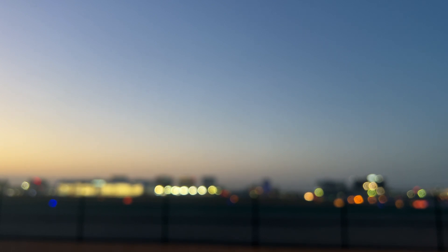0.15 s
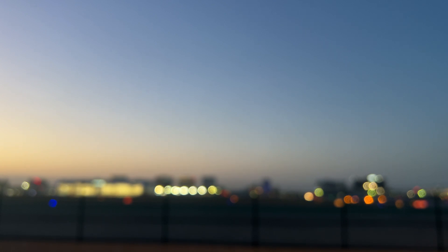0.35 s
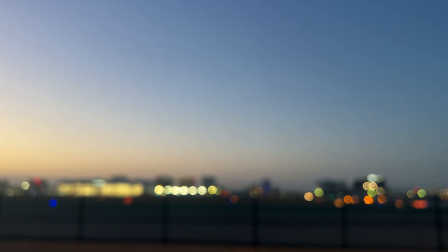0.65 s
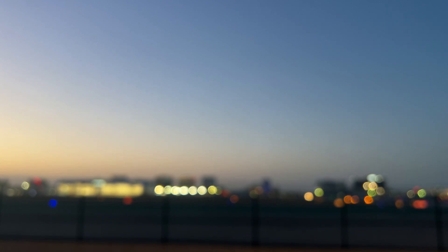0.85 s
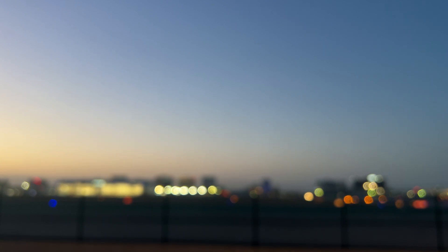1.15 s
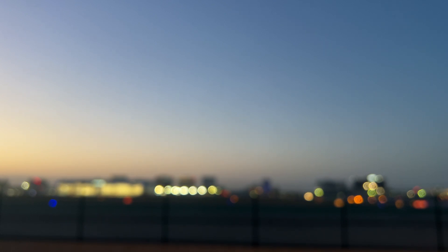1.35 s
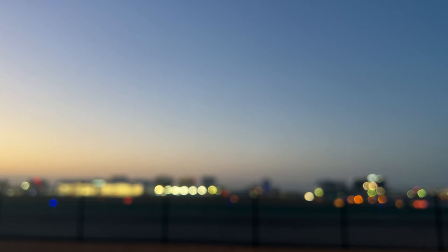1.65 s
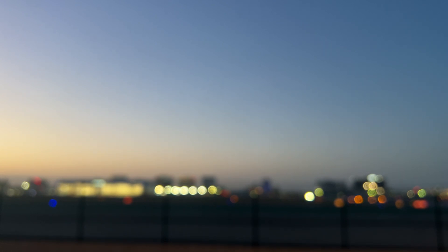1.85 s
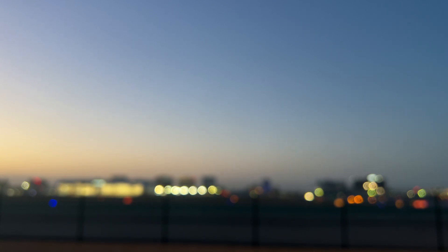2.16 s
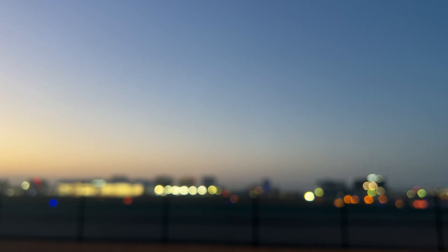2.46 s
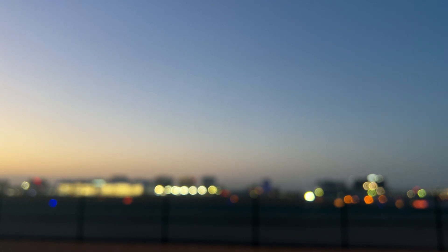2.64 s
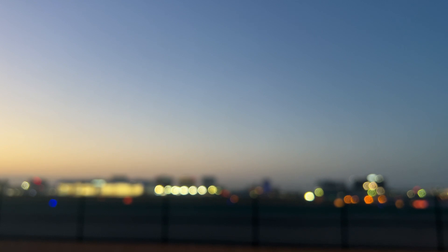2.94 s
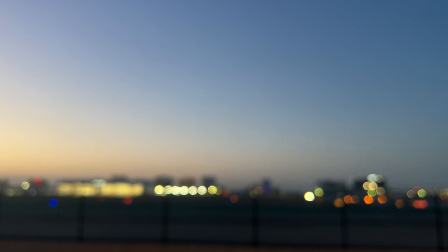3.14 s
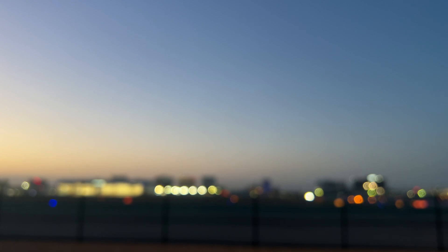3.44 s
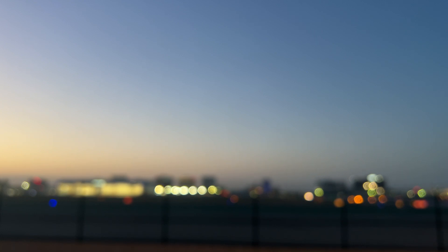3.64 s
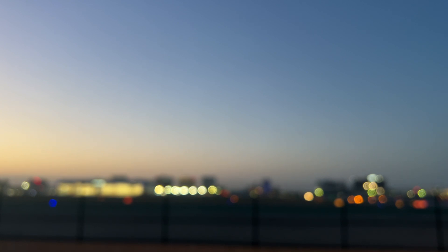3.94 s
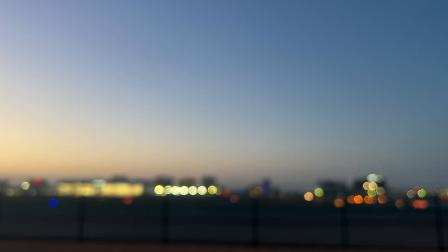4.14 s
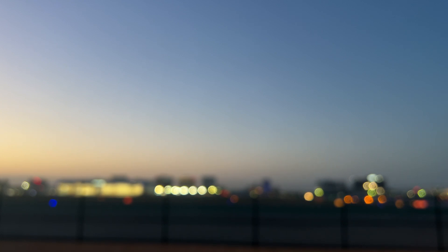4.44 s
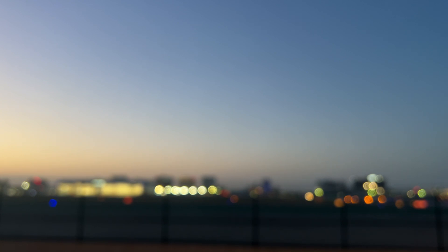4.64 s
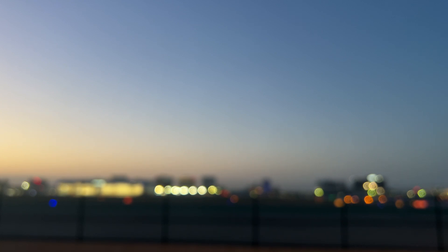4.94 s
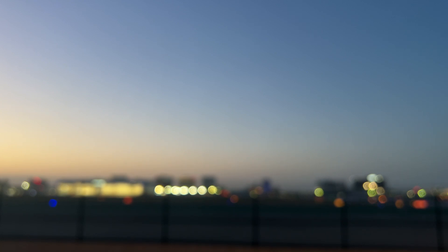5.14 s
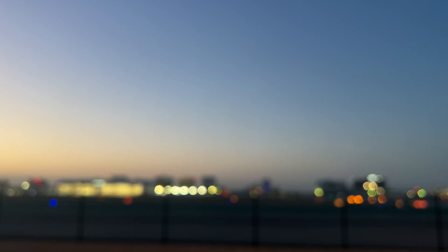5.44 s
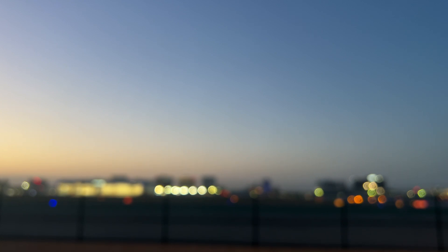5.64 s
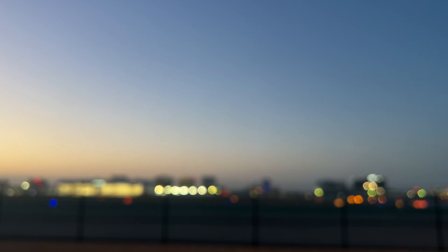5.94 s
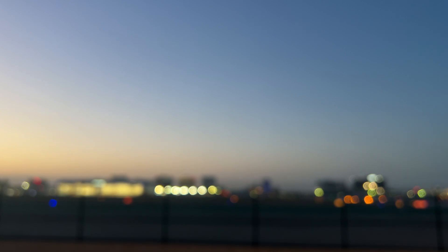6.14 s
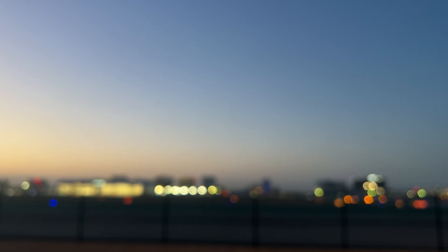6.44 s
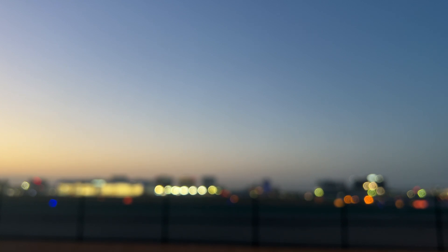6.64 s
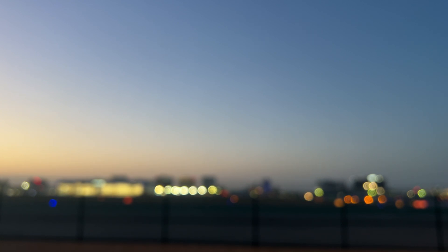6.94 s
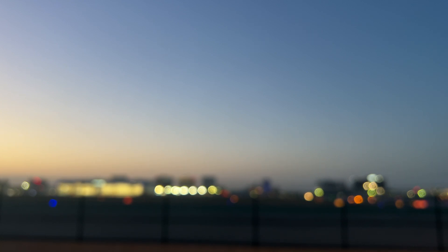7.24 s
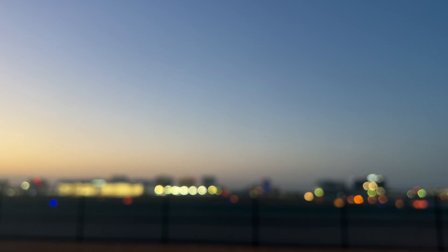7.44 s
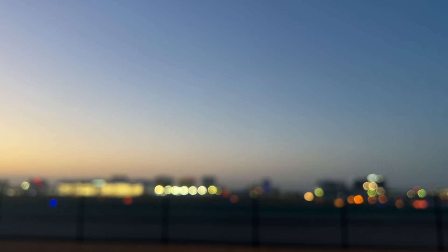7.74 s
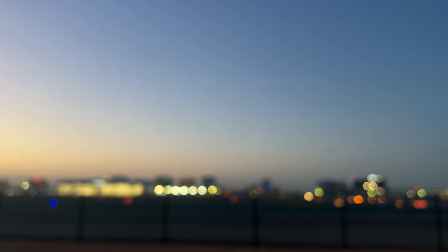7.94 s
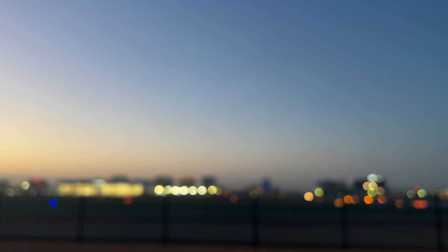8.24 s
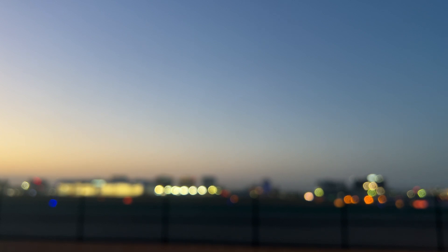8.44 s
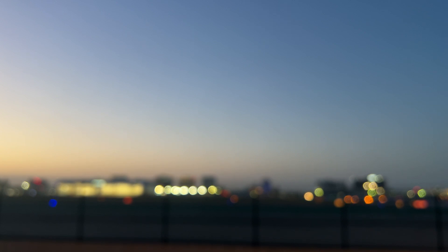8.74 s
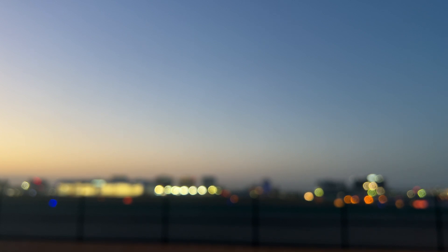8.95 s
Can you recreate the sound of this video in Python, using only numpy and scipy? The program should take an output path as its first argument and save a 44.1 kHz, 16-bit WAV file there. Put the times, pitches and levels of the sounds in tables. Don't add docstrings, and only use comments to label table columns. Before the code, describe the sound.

A wide, open outdoor ambience at dusk, dominated throughout by a low, soft rumble of far traffic and heavy engines, strongest in the deep bass, with a muffled middle and faint airy hiss. It swells slightly, with small blurred revs around 0.2, 1, 2.3 and 3.6 s, a firmer one at 5.2 and another at 5.9. A faint low machine drone near 91 Hz wavers underneath until it dies away just before 7 s. Very quietly above, grass insects make a fluttering high haze, and a cricket on the left rasps about eight times a second. Another gives faint short pips near 2.6, 2.9, 4.4 and 4.5 s. Soft deep booms roll in at 5.9, 6.8 and 7.2 s, the last with a dull knock, then at 8.1, loudest, and faintly at 8.4. The rumble continues to the end at about 9 s.

```python
import sys
import numpy as np
from scipy import signal
from scipy.fft import rfft, irfft, next_fast_len
from scipy.io import wavfile
from scipy.ndimage import uniform_filter1d, map_coordinates

SR = 44100
rng = np.random.default_rng(int(sys.argv[2]) if len(sys.argv) > 2 else 0)


def file_out(sig):
    cols = np.atleast_2d(sig).T
    lim = np.clip(cols, -1, 1)
    pcm = np.round(lim * 32767).astype(np.int16)
    wavfile.write(sys.argv[1], SR, pcm)


def ratio_of_db(decibels):
    return 10 ** (np.asarray(decibels, float) / 20)


N = 400869


def unit(x):
    return x / np.sqrt(np.mean(x ** 2) + 1e-20)


def along(points, hz):
    f, *cols = np.transpose(points)
    return [np.interp(np.log(hz + 1), np.log(f + 1), c) for c in cols]


def curves(rows):
    s, *cols = np.transpose(rows)
    return [np.interp(np.arange(N) / SR, s, c) for c in cols]


def wobble(rate):
    knots = rng.standard_normal(int(N * rate / SR) + 4)
    return map_coordinates(knots, [np.arange(N) * rate / SR])


def add(out, s, sound):
    out[round(s * SR):][:len(sound)] += sound


def at_ports(pair, gain):
    # pitch_hz, likeness (0-1), left_lead_rad, left_minus_right_db
    ports = [(60, 0.98, 0.1, -0.2), (200, 0.92, 0.2, 0.3), (400, 0.72, 0.5, 0.3), (520, 0.58, 1.6, 0.3),
             (700, 0.73, 2.5, 0.3), (1000, 0.6, 2.7, -1.5), (1250, 0.2, 3.7, -1.2),
             (1420, 0.63, 3.3, 1.3), (1620, 0.58, 3.2, -0.5), (1870, 0.1, 5.3, -0.5),
             (2050, 0.55, 6.3, -1.3), (2300, 0.75, 6.4, -1.8), (2700, 0.71, 6.7, -2.8),
             (3050, 0.27, 7.8, -1.6),
             (3400, 0.15, 8.9, 0.1), (3800, 0.06, 10.2, 1.7), (4350, 0.46, 9.5, 2.4),
                  (4700, 0.27, 10.1, 4.4), (5300, 0.27, 10.9, 8.7), (5600, 0.03, 11.1, 10.6),
                  (5900, 0.39, 13.4, 10.9), (6450, 0.51, 13.0, 8.1), (7000, 0.33, 12.3, 10.2),
                  (7500, 0.28, 11.3, 10.7), (7750, 0.19, 12.5, 7.0), (8050, 0.66, 13.0, 4.8),
                  (8300, 0.64, 12.9, 4.6), (8700, 0.42, 12.7, 1.6)]
    m = next_fast_len(N + 8192)
    hz = np.fft.rfftfreq(m, 1 / SR)
    alike, lead, tilt_db = along(ports, hz)
    turn = np.arccos(np.clip(alike, 0, 1)) / 2
    same, other = rfft(pair, m) * gain(hz) * [np.cos(turn), np.sin(turn)]
    shift = ratio_of_db(tilt_db / 2) * np.exp(.5j * lead)
    left = (same + other) * shift
    right = (same - other) / shift
    return irfft([left, right], m)[:, :N]


def rush(spectrum, patchy_db, size):
    z = signal.stft(rng.standard_normal((2, N)), nperseg=512)[2]
    field = uniform_filter1d(rng.standard_normal(z.shape[1:]), size[0], 0)
    field = uniform_filter1d(field, size[1], 1)
    pair = signal.istft(z * ratio_of_db(patchy_db * unit(field)), nperseg=512)[1][:, :N]
    ears = at_ports(pair, lambda hz: ratio_of_db(along(spectrum, hz)[0]))
    return ears / np.std(ears.mean(0))


def city():
    # pitch_hz, level_db (per Hz)
    throb_spectrum = [(8, -58.5), (20, -26), (30, -17), (40, -1), (52, 4.5), (62, 6.5), (75, -9.5),
                      (100, -54)]
    rumble_spectrum = [(40, -51.5), (55, -9), (65, 0.5), (80, -2.5), (100, -6.5), (118, -10.5), (150, -22),
                       (220, -81.5)]
    body_spectrum = [(70, -60), (100, -9), (125, -2), (170, 0), (230, -3), (300, -6.5), (400, -9.5),
                     (490, -12), (600, -34.5), (900, -77)]
    hiss_spectrum = [(400, -22), (520, -1), (680, -3.0), (950, -3.5), (1200, -6.0), (1400, -9.5),
                     (1650, -11.5), (2000, -14.5), (2400, -18), (2650, -20), (2900, -24.5), (3300, -25.5),
                     (3800, -29.5), (4300, -50.5)]
    # level_db, growth (dB per dB of effort)
    throb_law = (-41.5, 1.4)
    rumble_law = (-38, .9)
    body_law = (-36.5, 0.23)
    # time_s, effort_db
    effort = [(0, -3), (.6, 1), (1.25, -3), (1.8, -1), (2.4, -0.5), (3.3, -2.5), (3.8, -1), (4.1, 3),
              (4.5, -2), (5.4, 0.5), (6, 0), (6.4, 1.5), (6.8, 3.5), (7.4, 2), (7.8, 1.5), (8.2, 7.5),
              (8.65, -1), (9.09, 2.5)]
    # time_s, flow_db
    flow = [(0, .5), (1.25, 0.1), (1.9, 1), (3.2, -.5), (4.4, -0.9), (5.3, -0.4), (5.8, -1), (7, 0.4),
            (9.09, .5)]
    # peak_s, length_s, rise_db
    revs = [
        (0.202, 0.73, 2),
        (1.0, 0.44, 1),
        (2.3, 0.42, 1),
        (3.6, 0.46, 2),
        (5.222, 0.41, 5),
        (5.904, 0.62, 3),
        (7.2, 1.9, 2.5),
        (7.652, 0.44, 1.5),
        (8.6, 0.75, 1.5),
    ]

    (effort_db,), (flow_db,) = curves(effort), curves(flow)
    laws = (throb_law, rumble_law, body_law)
    throb_db, rumble_db, body_db = [db + grows * effort_db for db, grows in laws]
    t = np.arange(N) / SR
    for s, length, rise_db in revs:
        body_db = body_db + rise_db * np.cos(np.pi * np.clip((t - s) / length, -.5, .5)) ** 2
    air = wobble(4.3)
    throb = ratio_of_db(throb_db - 1.0 + .3 * air) * rush(throb_spectrum, patchy_db=0.3, size=(2, 20))
    rumble = ratio_of_db(rumble_db + 1.55 + 0.32 * air) * rush(rumble_spectrum, patchy_db=1.0, size=(2, 20))
    body = ratio_of_db(body_db - 0.2 + 0.13 * air) * rush(body_spectrum, patchy_db=0.45, size=(2, 24))
    hiss_db = -50 + flow_db + 0.24 * wobble(6.5)
    hiss = ratio_of_db(hiss_db) * rush(hiss_spectrum, patchy_db=1.32, size=(2, 30))
    return throb + rumble + body + hiss


def machines():
    # time_s, pitch_hz, level_db
    drone = [
        (0, 91.8, -38),
        (.6, 91.2, -38),
        (2.3, 90.1, -37.5),
        (4, 91, -38),
        (5.2, 91.6, -37),
        (6.4, 92, -39),
        (6.9, 91, -55),
    ]
    # peak_s, length_s, pitch_hz, peak_db
    booms = [
        (5.884, .12, 72.4, -23.5),
        (6.846, 0.18, 50.8, -24.5),
        (7.169, 0.099, 90.7, -23.5),
        (7.165, 0.0397, 188.5, -24.5),
        (7.349, .14, 57, -28),
        (8.098, .16, 75.3, -23),
        (8.372, 0.18, 60.3, -28),
    ]
    # pitch_hz, width_hz, level_db
    whines = [
        (442, 5, -60),
        (742, 6, -72),
        (2110, 10, -80),
        (3980, 12, -94),
        (6430, 60, -89),
    ]

    hz, db = curves(drone)
    turn = 2 * np.pi * np.cumsum(hz + 1.5 * wobble(9)) / SR
    overtone = ratio_of_db(-12.5 + 3 * wobble(2.6)) * np.sin(2 * turn)
    low = np.sqrt(2) * ratio_of_db(db + 2.0 * wobble(7)) * (np.sin(turn) + overtone)
    for s, length, boom_hz, boom_db in booms:
        u = np.arange(round(length * SR)) / SR
        boom = np.hanning(len(u)) * np.sin(2 * np.pi * boom_hz * u)
        add(low, s - length / 2, ratio_of_db(boom_db) * boom)

    def peaks(f):
        return sum(ratio_of_db(level) * np.sqrt(SR / w) * np.exp(-2 * ((f - c) / w) ** 2) for c, w, level in whines)

    return low + at_ports(rng.standard_normal((2, N)), peaks)


def crickets():
    # before_last_s, level_db
    strokes = [
        (0.027, -9.5),
        (0.017, 0),
        (0, 1.5),
    ]
    # start_s, length_s, pitch_hz, peak_db
    pips = [
        (2.567, .047, 5600, -67),
        (2.91, .015, 5400, -70),
        (4.362, .024, 5600, -66),
        (4.517, .018, 5600, -68),
    ]

    near, far = np.zeros(N + SR), np.zeros(N + SR)
    t = np.arange(round(.011 * SR)) / SR
    calls = chirps()
    chance = rng.standard_normal((len(calls), len(strokes), 2))
    for (s, db), luck in zip(calls, chance):
        for (early, stroke_db), (size, tune) in zip(strokes, luck):
            start_hz, fall = 6900 + 40 * tune, 95000
            stroke = np.hanning(len(t)) * np.sin(2 * np.pi * (start_hz * t - fall / 2 * t * t))
            add(near, s - early - t[-1] / 2, ratio_of_db(db + stroke_db + .6 * size - 62.5) * stroke)
    for s, length, hz, db in pips:
        u = np.arange(round(length * SR)) / SR
        swell = np.sqrt(np.sin(np.pi * u / length))
        add(far, s, ratio_of_db(db) * swell * np.sin(2 * np.pi * hz * u))
    return near[:N] * ratio_of_db([[2.5], [-4.5]]) + far[:N] * ratio_of_db([[1.5], [-1.5]])


def chirps():
    # time_s, late_ms (on the even beat), strength_db
    tempo = [(.13, 0, -5), (.5, -5, -7), (.745, -2, -3.5), (1.1, -15, -1.5), (1.6, -6, -1), (1.9, -10, -4),
             (2.46, -16, -2.5), (3.09, -9, -.5), (3.3, 0, -5.5), (3.6, 4, -4.5), (3.9, -2, -3),
             (4.2, 2, -4.5), (4.82, -10, -4), (5.45, 6, -5), (6.43, -11, -3.5), (7.15, 1, -6.5),
             (7.9, -3, -3), (8.3, 5, -5.5)]
    first_s, beat_s = .127, .12375
    beat = np.arange(first_s, N / SR, beat_s)
    s, late_ms, db = np.transpose(tempo)
    chirp_s = beat + np.interp(beat, s, late_ms) / 1000
    return np.transpose([chirp_s, np.interp(beat, s, db)])


def insects():
    # pitch_hz, level_db (per Hz)
    chorus_spectrum = [(3200, -60), (3800, -13), (4050, -3), (4500, 0.5), (5000, -3), (5500, -2),
                       (5900, -1.5), (6500, -8.5), (7000, -9.5), (7300, -6), (7700, -12), (8600, -24),
                       (9000, -61)]
    shrill_spectrum = [(6800, -49.5), (7250, -24.5), (7500, -12), (7800, -5), (7980, -3.5), (8060, 1.5),
                       (8140, -3), (8400, -11.5), (8600, -22), (8800, -22), (9200, -28.5)]
    # time_s, strength_db
    bush = [(0, -66), (.5, -69), (.8, -66), (1.1, -68.5), (1.75, -67.5), (2.5, -72), (3.5, -67.5),
            (3.75, -67.5), (4.05, -64.5), (4.8, -69.5), (5.15, -67.5), (6.3, -68.5), (6.6, -67), (6.8, -68),
            (7.05, -65), (7.4, -69), (7.75, -64), (9.09, -72.5)]

    shrill_db, = curves(bush)
    chorus_db = -67.5 - 0.15 * np.arange(N) / SR
    chorus = ratio_of_db(chorus_db - 1.37 + 0.22 * wobble(13)) * rush(chorus_spectrum, patchy_db=1.6, size=(2, 14))
    flutter = .7 * wobble(9) + .2 * wobble(30)
    shrill = ratio_of_db(shrill_db + flutter) * rush(shrill_spectrum, patchy_db=0.8, size=(2, 10))
    return chorus + shrill


def scene():
    return city() + machines() + insects() + crickets()


def roll_off(x):
    return signal.sosfilt(signal.butter(12, 9680, fs=SR, output="sos"), x)


def record(dry):
    hz, t, z = signal.stft(dry, SR, nperseg=2048)
    edge_hz = 8680 + 130 * uniform_filter1d(rng.standard_normal((2, 1, len(t))), 2)
    kept = signal.istft(z * (hz[:, None] < edge_hz), SR, nperseg=2048)[1][:, :N]
    return roll_off(kept)


dry = scene()
out = record(dry)
file_out(out)
```